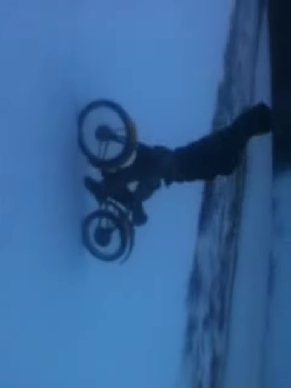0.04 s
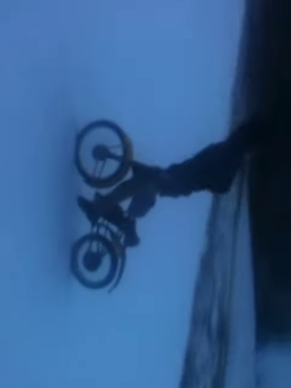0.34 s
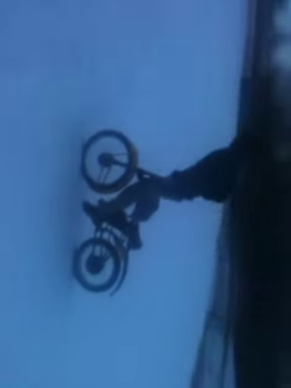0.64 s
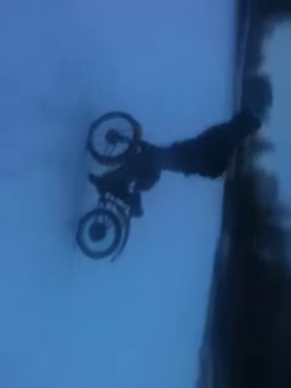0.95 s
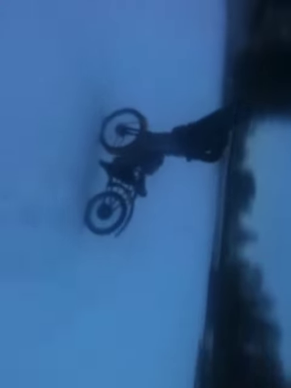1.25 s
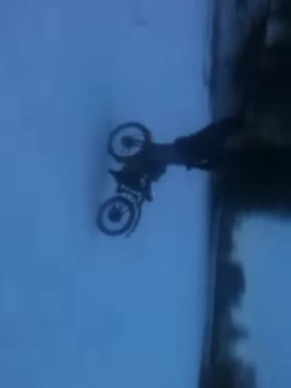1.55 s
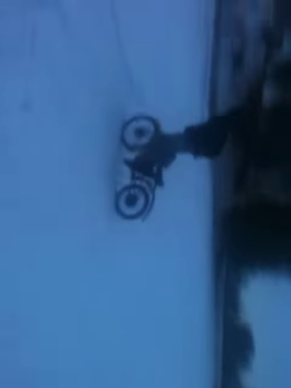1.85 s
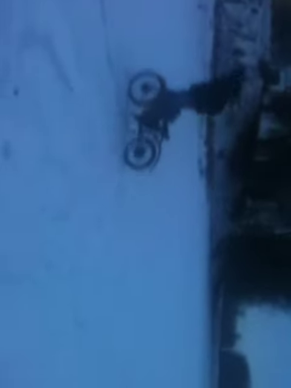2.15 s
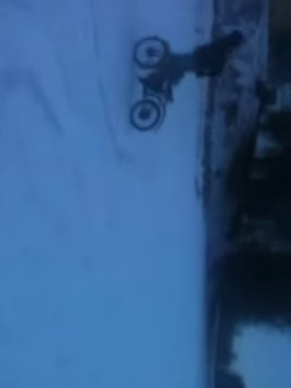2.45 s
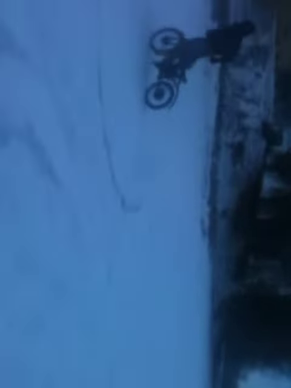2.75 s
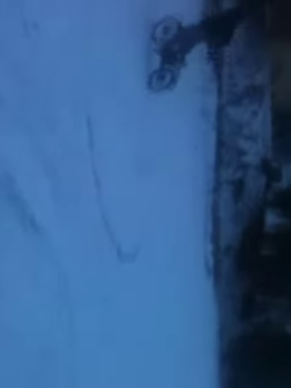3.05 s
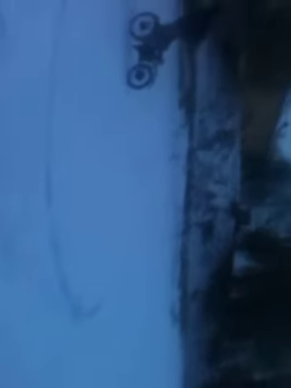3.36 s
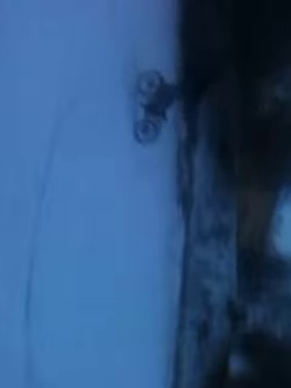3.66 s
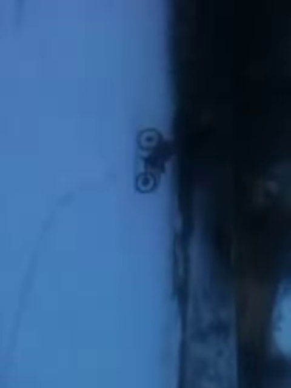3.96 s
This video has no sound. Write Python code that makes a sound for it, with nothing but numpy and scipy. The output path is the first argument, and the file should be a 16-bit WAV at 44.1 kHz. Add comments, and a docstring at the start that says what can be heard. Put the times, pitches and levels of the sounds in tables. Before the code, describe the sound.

A motorcycle engine snarls close by at steady revs, slightly overloading the microphone. Its pitch rises a little and it grows quieter as it rides away across open ice, with faint wind buffets near the end.

```python
"""A single-cylinder motorcycle holds a wheelie across a frozen lake and rides away.
Each firing rings the exhaust, whose resonances shift as the bike turns, and spits gas.
Tyres and engine hiss underneath; the shore returns a faint echo.
The close bangs overload the microphone, and a few gusts buffet it near the end."""
import sys
import numpy as np
from scipy import signal
from scipy.fft import rfft, irfft
from scipy.io import wavfile

SR = 44100
rng = np.random.default_rng(int(sys.argv[2]) if len(sys.argv) > 2 else 0)


def waveform_to_disk(signal):
    """Save audio, clipped to [-1, 1], as 16-bit WAV at the path in sys.argv[1]."""
    frames = np.transpose(np.atleast_2d(signal))
    scaled = np.clip(frames, -1, 1) * 32767
    samples = np.round(scaled).astype(np.int16)
    wavfile.write(sys.argv[1], SR, samples)


N = 176400

# engine speed (time [s], firing rate [Hz])
FIRING_RATE = [(0.0, 71.0), (0.04, 71.1), (0.14, 68.1), (0.2, 69.9), (0.28, 72.7), (0.35, 69.5),
               (0.42, 72.2), (0.52, 70.7), (0.57, 69.3), (0.61, 69.5), (0.66, 70.4), (0.73, 71.9),
               (0.85, 70.7), (1.0, 70.3), (1.06, 67.1), (1.16, 67.6), (1.27, 70.6), (1.38, 73.6),
               (1.5, 76.2), (1.62, 76.8), (1.73, 78.8), (1.93, 80.0), (2.04, 79.0), (2.13, 81.5),
               (2.21, 79.8), (2.28, 81.2), (2.46, 80.4), (2.55, 81.6), (2.76, 83.8), (2.83, 82.0),
               (2.93, 83.7), (3.02, 81.6), (3.15, 85.9), (3.23, 83.9), (3.36, 84.5), (3.43, 83.9),
               (3.55, 87.5), (3.64, 82.7), (3.75, 84.6), (3.82, 83.2), (4.0, 82.9)]


def amp(db):
    """Decibels to gain."""
    return 10 ** (np.asarray(db) / 20)


def unit(x):
    """Scales to rms 1."""
    return x / np.sqrt(np.mean(x ** 2) + 1e-20)


def curve(rows, column=1):
    """One column of a time table at every sample."""
    rows = np.array(rows)
    return np.interp(np.arange(N) / SR, rows[:, 0], rows[:, column])


def at_hz(rows, hz):
    """Interpolates a table over log frequency."""
    row_hz, value = np.transpose(rows)
    return np.interp(np.log(hz + 1), np.log(row_hz + 1), value)


def noise(spectrum):
    """Coloured noise of rms 1."""
    gain = amp(at_hz(spectrum, np.fft.rfftfreq(N, 1 / SR)))
    return unit(irfft(rfft(rng.standard_normal(N)) * gain, N))


def firings(jitter_s=2e-5, bang_spread_db=0.4, spit_spread_db=3):
    """Uneven combustion. Per bang: onset [samples], strength. Per sample: time since firing, spit gain."""
    rate_hz = curve(FIRING_RATE)
    cycles = np.cumsum(rate_hz) / SR + .3
    onsets = np.interp(np.arange(1, int(cycles[-1]) + 1), cycles, np.arange(N))
    late, weak, spit = rng.standard_normal((400, 3))[:len(onsets)].T
    onsets = np.clip(onsets + late * jitter_s * SR, 0, N - 2)
    age_s = cycles % 1 / rate_hz
    spit_gain = amp(spit_spread_db * spit)[cycles.astype(int) - 1]
    return onsets, amp(-bang_spread_db * weak), age_s, spit_gain


def pipe_response(onsets, hz, bass_cut_hz=157.6, low_lag_s=0.002263, lag_corner_hz=2335):
    """Exhaust spectrum at each firing: ten moving resonances with a sudden start."""
    # exhaust resonances (time [s], centre [Hz], relative level [dB])
    thump = [(0.0, 267, -25.5), (0.6, 154, -37.5), (1.2, 132.4, -35.5), (2.0, 222.4, -44.5),
             (3.5, 212, -30.5), (4.0, 230, -42)]
    body = [(0.0, 350, -21), (0.6, 490, -23), (1.15, 420, -23.5), (1.6, 445, -23.5), (2.5, 384, -23.5),
            (3.1, 424, -27), (3.55, 428.0, -24.2), (4.0, 337, -25)]
    bark = [(0, 840, -17), (.18, 860, -14), (.33, 870, -11.5), (.6, 826, -11), (.95, 802, -12),
            (1.15, 735, -16), (1.5, 695, -16), (2.1, 730, -20), (2.6, 680, -23), (2.95, 630, -31),
            (3.45, 683, -30), (3.7, 760, -26), (4, 714, -25.5)]
    throat = [(0.0, 995, -19.5), (1.1, 1008, -16.5), (1.6, 1108.0, -24), (2.4, 1130, -33), (3.3, 1100, -29),
              (3.7, 1090, -46), (4.0, 1161.0, -37)]
    honk = [(0.0, 1310, -23), (0.6, 1110, -14), (1.1, 1180, -18.5), (1.5, 1280, -19), (2.3, 1395, -22),
            (2.7, 1330, -23), (3.1, 1370, -19.5), (3.45, 1410, -25), (4.0, 1560, -38)]
    ring = [(0.0, 1990, -15), (0.25, 1790, -16.5), (0.55, 1570, -15), (0.9, 1610, -18.5),
            (1.3, 1740, -22.5), (1.6, 1715, -18.0), (1.9, 1803, -13.5), (2.3, 1790, -14.5),
            (2.6, 1835, -19), (2.85, 1850, -37), (3.3, 1660, -24), (3.55, 1680, -23.5), (3.75, 1885.0, -25),
            (4.0, 1810, -28)]
    snarl = [(0.0, 2066, -11), (0.3, 1817, -20.5), (0.6, 1970, -16.5), (0.85, 1820, -14.5),
             (1.1, 2070, -14), (1.5, 2174, -15), (1.85, 1940, -29.5), (2.5, 1810, -24), (2.8, 1790, -20.5),
             (3.15, 1950, -22.5), (3.4, 1792.0, -24), (4.0, 1853, -17.3)]
    rasp = [(0.0, 2450, -19.5), (0.7, 2150, -24.5), (1.2, 2208, -15.5), (1.65, 2460, -16.2),
            (2.1, 2553.0, -24.2), (2.7, 2440, -39.5), (3.15, 2120, -25), (3.3, 2540, -39),
            (3.6, 2920, -29.1), (4.0, 2480, -65)]
    edge = [(0.0, 3800, -31), (0.6, 3230, -35), (1.1, 3850, -41.5), (1.8, 2670, -27.5),
            (2.4, 2985.0, -29.5), (2.8, 3160, -25.5), (3.15, 3104.0, -24), (3.4, 3150, -29),
            (3.6, 3060, -31), (4.0, 3400, -40.5)]
    sizzle = [(0, 4680, -37), (1, 4950, -56), (2.3, 4900, -61), (3, 4900, -40), (4, 4950, -61)]
    starts = onsets.astype(int)

    def resonance(rows, width_hz, skirt_hz, lag_ms):
        centre_hz = curve(rows)[starts, None]
        level = amp(curve(rows, column=2)[starts, None])
        peak = sum(1 / (1 + 2j * offset / width_hz) / (1 + 2j * offset / skirt_hz)
                   for offset in (hz - centre_hz, hz + centre_hz))
        rms = np.sqrt(np.mean(abs(peak) ** 2, axis=1, keepdims=True))
        return level * peak / rms * np.exp(-2j * np.pi * hz * lag_ms / 1000)

    modes = (resonance(thump, width_hz=23, skirt_hz=74, lag_ms=0.36)
             + resonance(body, width_hz=177, skirt_hz=149, lag_ms=0.5)
             + resonance(bark, width_hz=194, skirt_hz=194, lag_ms=0.58)
             + resonance(throat, width_hz=200, skirt_hz=540, lag_ms=0.42)
             + resonance(honk, width_hz=190, skirt_hz=480, lag_ms=0.28)
             + resonance(ring, width_hz=104, skirt_hz=1650, lag_ms=0.28)
             + resonance(snarl, width_hz=184, skirt_hz=1440, lag_ms=0.15)
             + resonance(rasp, width_hz=270, skirt_hz=280, lag_ms=0.068)
             + resonance(edge, width_hz=350, skirt_hz=450, lag_ms=0)
             + resonance(sizzle, width_hz=220, skirt_hz=320, lag_ms=0))
    period_samples = SR / curve(FIRING_RATE)[starts, None]
    gain = abs(modes) * np.sqrt(period_samples / (1 + (bass_cut_hz / (hz + 1)) ** 6))
    log_gain = np.log(gain + .01)
    mirrored = np.hstack([log_gain, log_gain[:, -2:0:-1]])
    minimum_phase = -signal.hilbert(mirrored).imag[:, :len(hz)]
    # the lows leave the pipe slightly late
    lag_phase = 2 * np.pi * low_lag_s * lag_corner_hz * np.arctan(hz / lag_corner_hz)
    return gain * np.exp(1j * (minimum_phase - lag_phase))


def exhaust(onsets, strength, age_s, puff_db=-20, puff_s=0.0057, flow_db=-20, rough_above_hz=2100):
    """Each bang and its puff of turbulent gas ring the pipe; the bass stays clean."""
    n_fft = 2048
    hz = np.fft.rfftfreq(n_fft, 1 / SR)
    starts = onsets.astype(int)
    puff, flow = rng.standard_normal((2, N + n_fft))[:, :N]
    gas = amp(puff_db) * unit(puff * np.exp(-age_s / puff_s)) + amp(flow_db) * flow
    puffs = np.array([rfft(cycle, n_fft) for cycle in np.split(gas, starts)[1:]])
    puffs *= np.sqrt(len(onsets) / N) * hz / np.hypot(hz, rough_above_hz)
    bangs = strength[:, None] * np.exp(-2j * np.pi * hz * (onsets % 1)[:, None] / SR)  # sub-sample timing
    rings = irfft((bangs + puffs) * pipe_response(onsets, hz), n_fft)
    pipe = np.zeros(N + n_fft)
    for start, ring in zip(starts, rings):
        pipe[start:start + n_fft] += ring
    return pipe[:N]


def gas_and_tyre_hiss(age_s, spit_gain, spit_s=0.0012, crack_s=0.0073):
    """A sharp spit and a longer crack of gas per firing, over the wash of tyres and engine."""
    # noise spectra (frequency [Hz], relative level [dB])
    spit_spectrum = [(2500, -7), (4800, -1), (7500, 1), (10000, -10), (16000, -9.5)]
    crack_spectrum = [(1500, -25), (3000, 9), (4000, 2.5), (4800, -4), (5800, -9.5), (7300, -9),
                      (8500, -9.5), (10500, -32), (16000, -34)]
    wash_spectrum = [(20, 2.5), (100, -2), (300, 1), (900, 9), (2000, 14), (3300, -5.5), (4000, -8.5),
                     (4900, -1.5), (5800, -9), (7500, -15.5), (10000, -33), (16000, -43)]
    # common gain of the three noises (time [s], level [dB])
    treble_level = [(0.0, -27), (0.01, -31), (0.54, -30), (1.68, -31.5), (2.46, -33), (2.51, -35),
                    (2.76, -34), (3.62, -37), (4.0, -35)]
    spit = unit(noise(spit_spectrum) * spit_gain * age_s * np.exp(-age_s / spit_s))
    crack = unit(noise(crack_spectrum) * np.exp(-age_s / crack_s))
    wash = noise(wash_spectrum)
    return amp(curve(treble_level)) * (amp(-6) * spit + amp(1.5) * crack + amp(9.5) * wash)


def shore_echo(source, delay_s=0.02):
    """Scattered echoes from the trees and the bank."""
    # echo decay (frequency [Hz], T60 [s])
    decay_times = [(150, 0.2), (800, 0.24), (2500, 0.21), (8000, 0.18)]
    hz, t, spectra = signal.stft(rng.standard_normal(SR), SR, nperseg=256)
    envelope = amp(-60 * t / at_hz(decay_times, hz)[:, None]) * (t > delay_s)
    _, tail = signal.istft(spectra * envelope, SR, nperseg=256)
    return signal.fftconvolve(source, tail / np.linalg.norm(tail))[:N]


def wind():
    """Short low buffets on the microphone."""
    # buffet spectrum (frequency [Hz], relative level [dB])
    spectrum = [(20, -12), (70, -28), (120, 2.5), (180, 4.5), (280, 0.5), (450, -6.5), (1000, -31),
                (4000, -70)]
    # gusts (time [s], 1/e half-width [s], level [dB])
    gusts = [(2.982, .04, -29.5), (3.3, 0.028, -29), (3.897, 0.032, -25), (3.99, 0.048, -22.5)]
    t = np.arange(N) / SR
    envelope = sum(amp(db) * np.exp(-((t - peak_s) / half_s) ** 2) for peak_s, half_s, db in gusts)
    return noise(spectrum) * envelope


def scene(echo_db=-18.5):
    """The bike, its echo and the wind, in mono."""
    onsets, strength, age_s, spit_gain = firings()
    pipe = exhaust(onsets, strength, age_s)
    echo = amp(echo_db) * shore_echo(pipe)
    return (pipe + echo + gas_and_tyre_hiss(age_s, spit_gain) + wind())[None]


def record(dry, ceiling=0.73, knee=3.9, low_cut_hz=63, high_cut_hz=15800):
    """The microphone flattens loud peaks, thins the deepest bass and limits the top."""
    squashed = dry / (1 + abs(dry / ceiling) ** knee) ** (1 / knee)
    highpass = signal.butter(1, low_cut_hz, "high", fs=SR, output="sos")
    lowpass = signal.firwin(511, high_cut_hz, window=("kaiser", 9), fs=SR)
    return signal.oaconvolve(signal.sosfilt(highpass, squashed), lowpass[None], "same")


dry = scene()
out = record(dry)
waveform_to_disk(out)
```